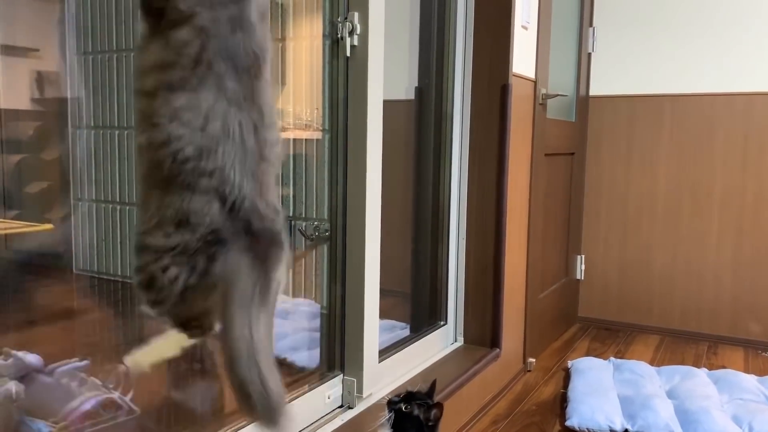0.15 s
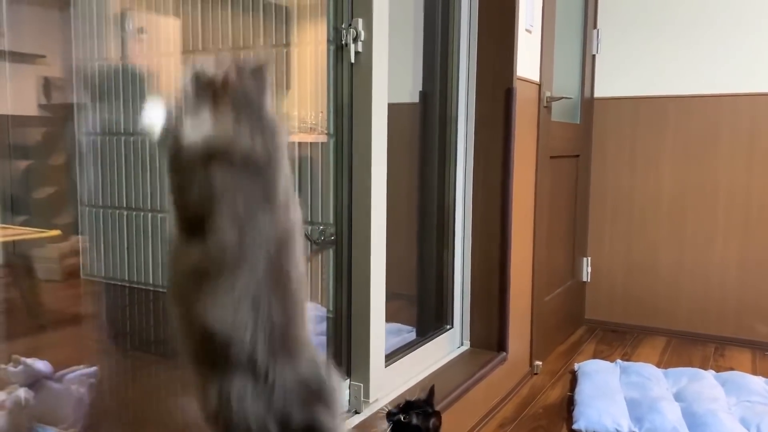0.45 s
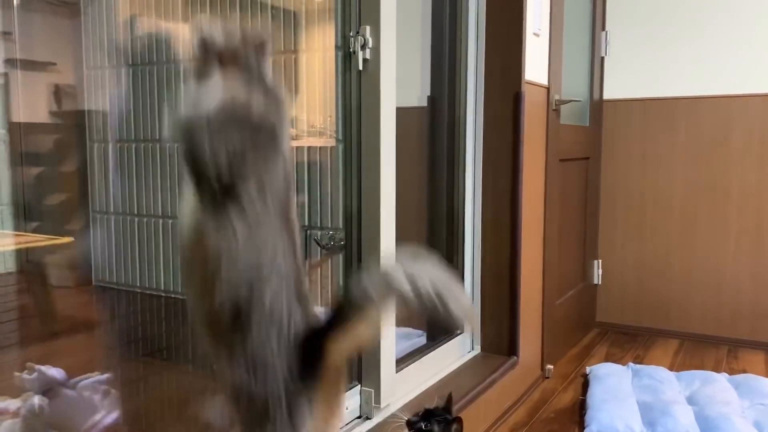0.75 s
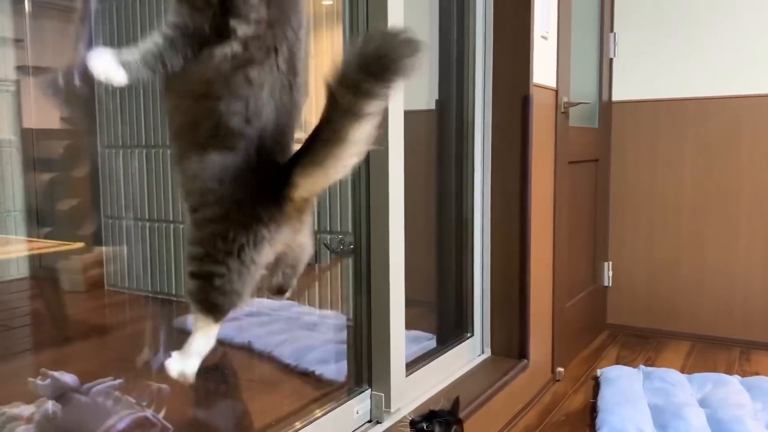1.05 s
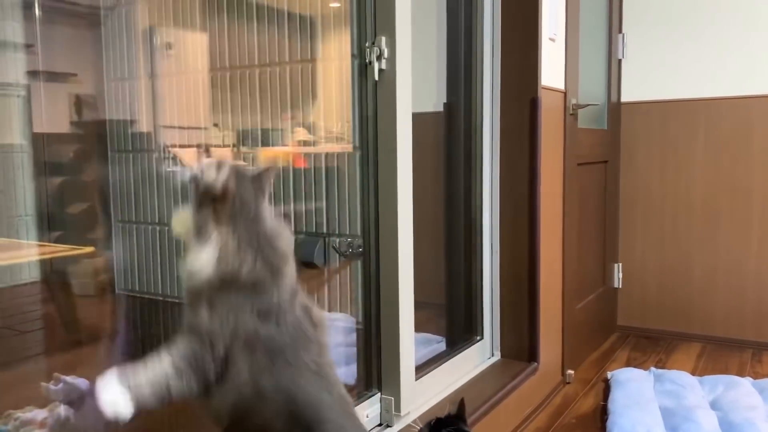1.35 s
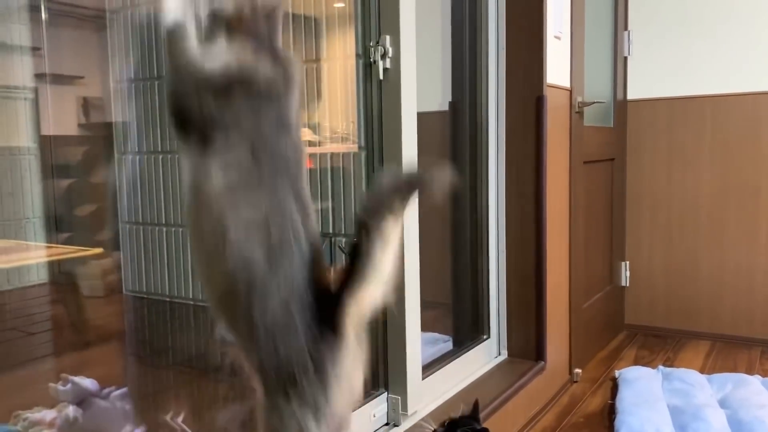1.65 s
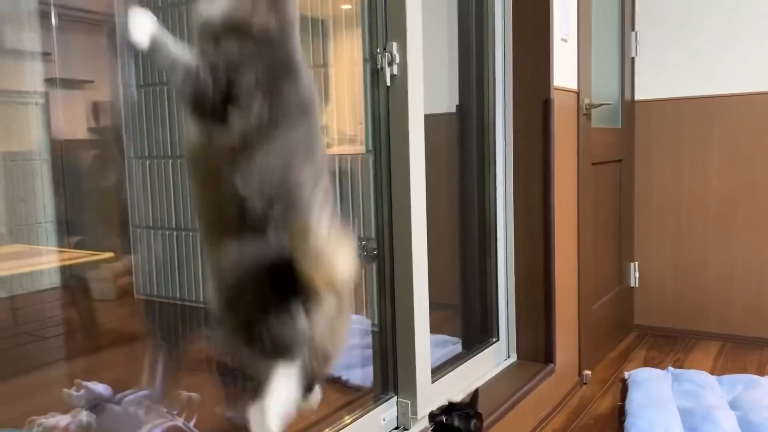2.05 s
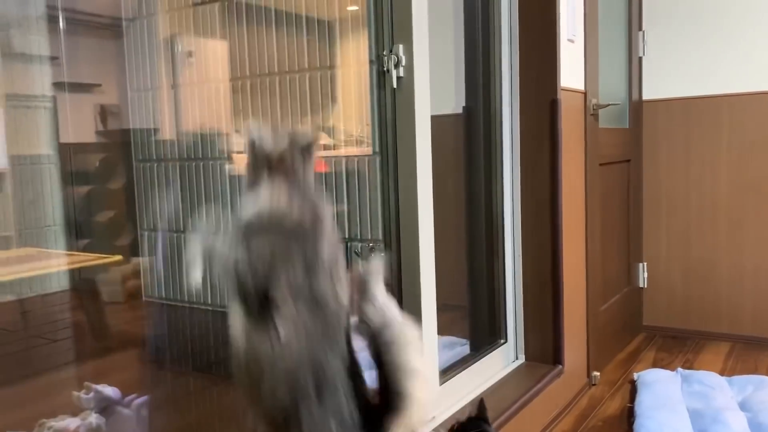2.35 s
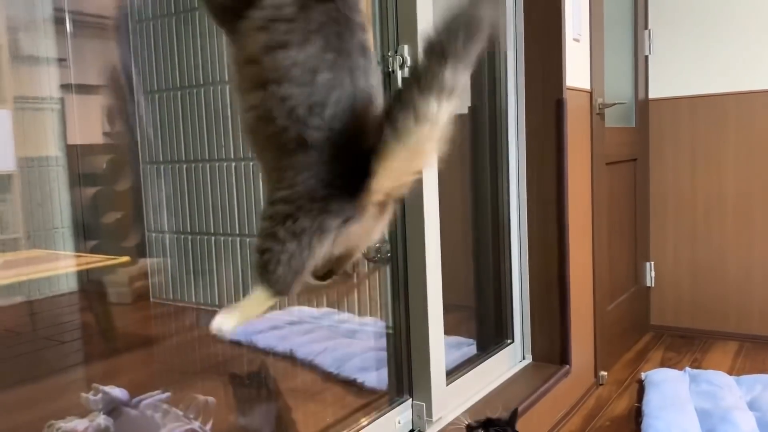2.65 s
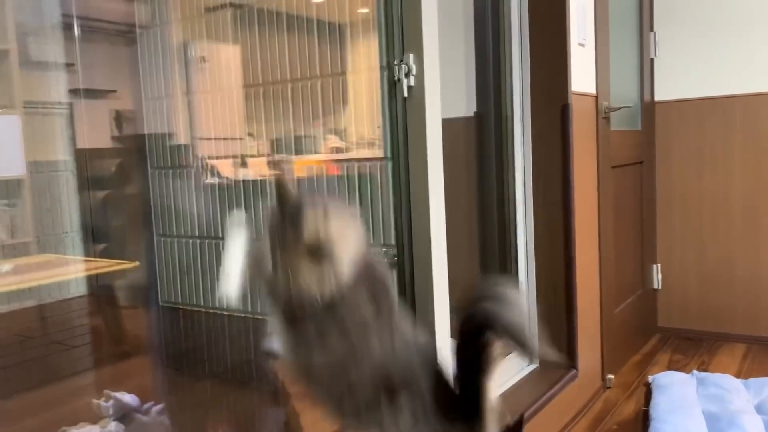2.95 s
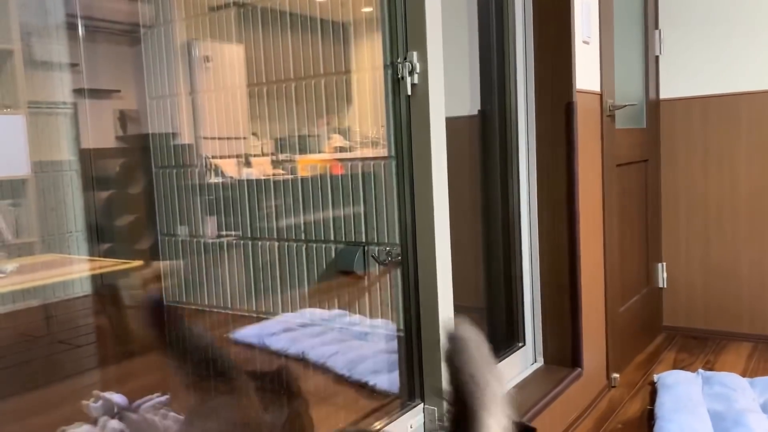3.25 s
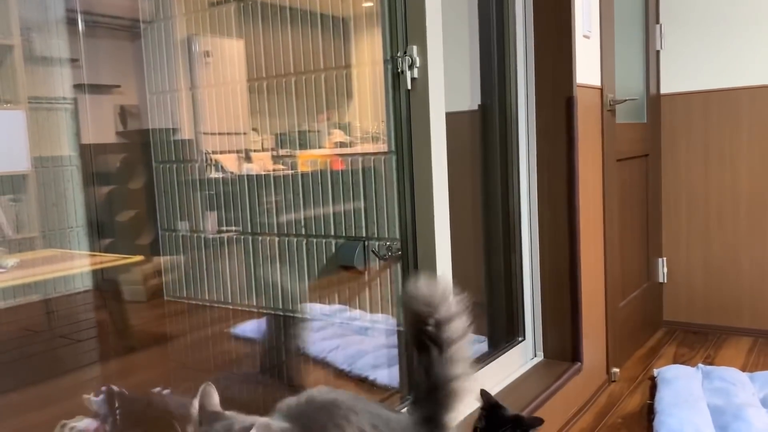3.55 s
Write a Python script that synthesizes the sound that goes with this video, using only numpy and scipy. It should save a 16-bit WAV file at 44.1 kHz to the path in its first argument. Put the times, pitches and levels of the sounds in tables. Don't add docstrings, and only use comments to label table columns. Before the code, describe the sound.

Cat leaping at a sliding glass door: scratches, paw knocks, floor thuds, then a loud clatter.

```python
import sys
import numpy as np
from scipy import signal
from scipy.fft import rfft, irfft
from scipy.io import wavfile
from scipy.ndimage import uniform_filter1d

SR = 44100
rng = np.random.default_rng(int(sys.argv[2]) if len(sys.argv) > 2 else 0)


def materialize(psi):
    bounded = np.clip(np.atleast_2d(psi).T, -1, 1)
    quanta = np.round(bounded * 32767).astype(np.int16)
    wavfile.write(sys.argv[1], SR, quanta)


def nominal_scale(level):
    x = np.asarray(level, float) / 20
    return 10 ** x


N = 163170
T = np.arange(N) / SR

# (frequency [Hz], level [dB])
FRAME_COLOUR = [(420, -5.5), (850, -2), (1500, 5.5), (2400, -1), (4400, -6)]
FRAME_DB = 6
ALIKE_HZ = 840
TOP_HZ = 16000


def unit(x):
    return x / np.sqrt(np.mean(x ** 2) + 1e-20)


def shape(x, gain):
    n = x.shape[-1]
    hz = np.arange(n // 2 + 1) * SR / n + 1e-3
    return irfft(rfft(x) * gain(hz), n)


def ring(modes, db, detune, secs, turn=0):
    hz, base_db, t60 = np.array(modes).T[:, :, None]
    t = T[:int(secs * SR)]
    fade = np.exp(-np.log(1000) * t / np.maximum(t60, 0.001))
    phase = 2 * np.pi * hz * (1 + detune[:, None]) * t + np.reshape(turn, (-1, 1))
    return (nominal_scale(base_db + db[:, None]) * fade * np.sin(phase)).sum(axis=0)


def crowd(colour, cycles, count):
    at, db = np.array(colour).T
    hz = np.geomspace(at[0], at[-1], count)
    level = np.interp(np.log(hz), np.log(at), db)
    return np.array([hz, level, cycles / hz]).T


def strikes(rows, modes, colour, rate, spread_db, first_db, rise_s, push_s, secs, mess, scatter_db=2.0):
    out, n, t = np.zeros(N + SR), len(modes), T[:6000]
    lead = 400
    push = np.hanning(int(push_s * SR) + 3)
    for start_s, level_db, run_s, sharpness in rows:
        luck, grain = rng.standard_normal((3, n)), rng.random((3, len(t)))
        happens, sign = grain[0] < rate / SR, np.sign(grain[2] - 0.5)
        touch = happens * sign * nominal_scale(-spread_db * np.log(grain[1] + 1e-4))
        touch = touch * np.exp(-t / max(run_s, 0.002)) * np.minimum(t / rise_s, 1)
        touch[0] = nominal_scale(first_db)
        body = ring(modes, scatter_db * luck[0], 0.015 * luck[1], secs, np.pi / 2 + mess * luck[2])
        body = shape(np.pad(body, (lead, lead)), lambda hz: nominal_scale(colour(hz, sharpness)))
        sound = signal.fftconvolve(np.convolve(touch, push), body)
        i = int(start_s * SR) - lead
        out[i:i + len(sound)] += sound * nominal_scale(level_db) / np.abs(sound).max()
    return out[:N]


def air():
    # (frequency [Hz], density [dB per Hz])
    hum_spectrum = [(15, -31), (25, 3), (117, -11.5), (185, -5.5), (326, -18.5), (3080, -50), (5430, -54.5),
                    (12000, -54), (16000, -63.5)]
    hz, db = np.array(hum_spectrum).T

    def colour(f):
        return nominal_scale(np.interp(np.log(f), np.log(hz), db)) * (f > 20) * (f < TOP_HZ)

    mid, side = shape(rng.standard_normal((2, N)), colour)
    side = shape(side, lambda f: np.clip(f / ALIKE_HZ, 0.1, 1))
    return unit(mid + side * np.array([[1], [-1]])) * nominal_scale(-52.5)


def wobble():
    # (time [s], level [dB])
    effort = [(0, -80), (.22, -65), (.33, -36.5), (.5, -53), (.75, -44), (.99, -33.5), (1.2, -41.5),
              (1.33, -47.5), (1.62, -44), (1.84, -37.5), (2.15, -46.5), (2.4, -39), (2.66, -42),
              (2.88, -40), (3.12, -44.5), (3.3, -50.5), (3.7, -72)]
    # (frequency [Hz], level [dB], T60 [s])
    pane_modes = [(41, -2, 0.14), (53.7, 4, 0.32), (63.6, -3, 0.2), (90, -9, 0.08)]
    shoves = rng.standard_normal(N) * (rng.random(N) < 70 / SR)
    still = np.zeros(len(pane_modes))
    slow = signal.fftconvolve(shoves, ring(pane_modes, still, still, 0.5))[:N]
    slow = shape(slow, lambda f: 1 / (1 + (f / 110) ** 6))
    slow = slow / np.sqrt(uniform_filter1d(slow ** 2, size=5000) + 0.037 * np.mean(slow ** 2))
    return slow * nominal_scale(np.interp(T, *np.array(effort).T))


def scuffs():
    # (time [s], level [dB], drag [s], sharpness above 1.5 kHz [dB])
    strokes = [(0.125, -67.5, 0.021, -10.5), (0.19, -72, 0.037, 4), (0.79, -53.5, 0.067, -2.5),
               (0.85, -51.5, 0.016, -3.5), (1.12, -56, 0.075, -10), (1.23, -61.5, 0.15, -7),
               (1.69, -61.5, 0.019, -7), (1.728, -50.5, 0.0078, -5), (1.78, -53.5, 0.021, -6),
               (2.49, -53, .03, -8), (2.535, -52.5, .015, -3.5), (2.79, -47.5, 0.017, 0.5),
               (3.3, -68, .08, 2)]

    def sharp(hz, db):
        return db * np.clip(np.log2(hz / 800), 0, 1.5) - 10 * np.log10(1 + (hz / 4200) ** 4)

    return strikes(strokes, crowd(FRAME_COLOUR, cycles=24, count=44), sharp, rate=4000, spread_db=1.8,
                   first_db=-38, rise_s=0.025, push_s=0, secs=0.05, mess=0.45) * nominal_scale(FRAME_DB)


def knocks():
    # (time [s], level [dB], rattle [s], sharpness above 1.5 kHz [dB])
    blows = [(0.132, -51, 0.0039, -21), (0.23, -41.5, 0.0053, -2.5), (0.297, -52, 0.012, 3.5),
             (0.478, -59.5, 0.008, -9.5), (0.511, -41.5, 0.0074, -9), (0.585, -45, 0.0067, -2),
             (0.698, -54.5, 0.048, -10.5), (0.97, -40, 0.007, -11), (1.342, -37, 0.0047, -6),
             (1.386, -38, 0.014, -7), (1.849, -41.5, 0.0089, -6.5), (1.977, -44.5, 0.017, -13),
             (2.229, -38.5, 0.019, -6), (2.276, -33, 0.0089, -8.5), (2.613, -46, 0.023, -2.5),
             (2.831, -38.5, 0.0061, -3), (3.041, -29, 0.034, 6.5), (3.082, -12.5, 0.0017, 4.5),
             (3.091, -39.5, 0.0026, -3), (3.098, -21, 0.001, 0.5), (3.103, -24, 0.0127, -17.5),
             (3.12, -40, 0.004, -7), (3.149, -22, 0.0017, -20)]
    pad_top_hz = 2980

    def sharp(hz, db):
        return db * np.clip(np.log2(hz / 800), 0, 1.5) - 10 * np.log10(1 + (hz / pad_top_hz) ** 5)

    return strikes(blows, crowd(FRAME_COLOUR, cycles=26, count=44), sharp, rate=1500, spread_db=3.0,
                   first_db=-1, rise_s=0.0053, push_s=0, secs=0.08, mess=0.34,
                   scatter_db=0.9) * nominal_scale(FRAME_DB)


def claws():
    # (time [s], level [dB], skid [s], sharpness of the top [dB])
    skids = [(0.2262, -44.5, 0.0079, -3), (0.233, -35, 0.0056, -10.5), (0.24, -43.5, 0.013, -22),
             (0.2545, -34, 0.0035, 3.5), (0.262, -31.5, 0.0058, -4.5), (0.2925, -45.5, 0.006, 5),
             (0.5773, -53.5, 0.027, 3.5), (0.7143, -53.5, 0.021, -4), (0.968, -50, 0.0051, -19),
             (0.978, -28.5, 0.018, 4), (0.986, -22.5, 0.0037, 3), (0.993, -26.5, 0.0081, -8.5),
             (1.2744, -66.5, 0.067, -23), (1.3408, -55, 0.02, 6), (1.4044, -37.5, 0.016, -1),
             (1.726, -70, 0.012, 17), (1.738, -61, 0.0042, 9), (1.79, -60, 0.027, -7),
             (1.8453, -22.5, 0.014, 5), (1.88, -36, 0.018, -1), (1.9776, -30, 0.0074, 0),
             (2.2244, -46, 0.027, -5.5), (2.2757, -44.5, 0.034, 0), (2.469, -60.5, 0.0073, -14),
             (2.615, -24.5, 0.012, 4.5), (2.6894, -39, 0.0099, -14), (2.827, -33, 0.012, -9),
             (2.9427, -44, 0.045, -11.5), (3.045, -32, 0.068, 7), (3.0812, -21.5, 0.0013, 10),
             (3.0905, -17, 0.0033, 2), (3.1, -34.5, 0.029, 16), (3.1393, -36.5, 0.053, -0.5)]
    # (frequency [Hz], level [dB])
    glass_colour = [(2200, 1), (3500, -11), (4550, 19), (5700, 13.5), (8000, 4.5), (12000, -7.5),
                    (15500, -20)]

    def sharp(hz, db):
        return db * np.clip(np.log2(hz / 5500) * 2, 0, 1)

    return strikes(skids, crowd(glass_colour, cycles=24, count=40), sharp, rate=9000, spread_db=2.42,
                   first_db=0, rise_s=0.0013, push_s=0, secs=0.046, mess=0.88,
                   scatter_db=3.8) * nominal_scale(4.5)


def thuds():
    # (time [s], level [dB], push [s], strongest mode [Hz])
    landings = [(0.229, -42, 0.091, 412), (0.297, -27, 0.033, 262), (0.319, -25.5, 0.0024, 267),
                (0.353, -30.5, 0.029, 261), (0.516, -23, 0.014, 244), (0.584, -19.5, 0.0092, 234),
                (0.705, -32.5, 0.05, 266), (0.976, -23.5, 0.024, 310), (1.045, -29.5, 0.032, 275),
                (1.358, -24.5, 0.0033, 149), (1.409, -21, 0.0049, 253), (1.455, -37, 0.0083, 255),
                (1.485, -34.5, 0.012, 242), (1.755, -41.5, 0.16, 142), (1.848, -28, 0.069, 306),
                (1.882, -45, 0.021, 321), (1.928, -35.5, 0.011, 320), (1.983, -30.5, 0.037, 274),
                (2.231, -22, 0.029, 124), (2.283, -18.5, 0.015, 256), (2.635, -32.5, 0.055, 258),
                (2.696, -34, 0.03, 283), (2.83, -27.5, 0.038, 500), (3.044, -20, 0.041, 172),
                (3.091, -13, 0.0085, 295), (3.146, -9.5, 0.015, 286), (3.167, -15.5, 0.021, 272),
                (3.203, -27, 0.02, 241), (3.24, -22.5, 0.0077, 195)]
    # (frequency [Hz], level [dB], T60 [s])
    floor_modes = [(124, -0.5, 0.052), (167.5, -2.5, 0.058), (214.4, -3, 0.049), (255, 0.5, 0.064),
                   (301.6, -3.5, 0.066), (359.6, -0.5, 0.049), (407.7, -3.5, 0.046), (456, -10, 0.024),
                   (512.7, -8, 0.05), (631, -9.5, 0.03), (695, -10.5, 0.044), (786, -12, 0.025),
                   (877, -9, 0.034)]
    focus_db, focus_oct = 5, 0.3

    def focus(hz, strongest_hz):
        return focus_db * np.exp(-(np.log2(hz / strongest_hz) / focus_oct) ** 2)

    return strikes(landings, floor_modes, focus, rate=350, spread_db=2.95, first_db=0, rise_s=0.0038,
                   push_s=0.00083, secs=0.58, mess=1.57)


def bell():
    # (frequency [Hz], level [dB], T60 [s])
    bell_modes = [(3055, -2, .12), (5365, -4, .05), (6290, -12, .04)]
    # (time [s], level [dB], tilt to upper modes [dB])
    taps = [
        (3.33, -53.5, -14),
        (3.347, -60, 18.5),
        (3.415, -68, 7),
        (3.447, -62, 2),
        (3.534, -63, -15.5),
        (3.6, -79, 22),
        (3.63, -70.5, -21),
        (3.68, -72, -12),
    ]
    out, upper = np.zeros(N + SR), np.arange(len(bell_modes)) > 0
    for s, db, tilt_db in taps:
        tap = ring(bell_modes, tilt_db * upper, 0.0069 * rng.standard_normal(len(bell_modes)), 0.18)
        tap = tap * np.minimum(T[:len(tap)] / 0.0047, 1)
        i = int(s * SR)
        out[i:i + len(tap)] += nominal_scale(db) * tap
    return out[:N]


def room():
    # (frequency [Hz], T60 [s])
    room_decay = [(125, 0.36), (500, 0.41), (2000, 0.45), (5000, 0.46), (12000, 0.59)]
    at, secs = np.array(room_decay).T
    t, out = T[:SR // 2], 0
    mid, side = rng.standard_normal((2, len(t)))
    for hz in 62.5 * 2 ** np.arange(9):
        t60 = np.interp(np.log(hz), np.log(at), secs)
        pair = mid + np.clip(hz / ALIKE_HZ, 0.2, 1) * side * np.array([[1], [-1]])
        band = shape(pair, lambda f: np.clip(1 - np.abs(np.log2(f / hz)), 0, 1))
        band = band * np.exp(-np.log(1000) * t / t60)
        out = out + band * np.sqrt(hz / np.sum(band ** 2, axis=1, keepdims=True))
    out = out * np.clip((t - 0.002) / 0.0051, 0, 1)
    return out / np.sqrt(np.mean(np.sum(out ** 2, axis=1)))


def scene():
    parts = claws() + bell(), knocks(), thuds(), scuffs()
    wet_db = -2, 3, -3.5, 0
    pan_db, soft_walls_hz = 2.47, 9900

    def dull(f):
        return (f < TOP_HZ) / (1 + (f / soft_walls_hz) ** 2)

    far = 0
    for part, db in zip(parts, wet_db):
        sent = shape(part, dull)[None] * nominal_scale(db)
        far = far + signal.fftconvolve(sent, room())[:, :N]
    direct = sum(parts) * nominal_scale(np.array([[pan_db], [-pan_db]]) / 2)
    return direct + far + wobble() + air()


def top_cut(x):
    return signal.sosfilt(signal.butter(12, 16650, fs=SR, output="sos"), x)


def record(dry):
    one_path_hz, lag_from_hz, port_lag_s = 7270, 1810, 0.000259
    case_from_hz, case_step_hz = 1400, 260
    turns = np.cumsum(rng.standard_normal(100))

    def share(f):
        return 1 / (1 + (one_path_hz / f) ** 8)

    def lag(f):
        return np.exp(2j * np.pi * f * port_lag_s * np.clip(f / lag_from_hz - 0.5, 0, 1))

    def case(f):
        phase = np.interp(f / case_step_hz, np.arange(100), turns - turns[0])
        return np.exp(1j * phase * np.clip(f / case_from_hz - 0.5, 0, 1))

    right = shape(dry[1], lambda f: (1 - share(f)) * case(f)) + shape(dry[0], share)
    right = shape(right, lag)
    return top_cut(np.array([dry[0], right]))


dry = scene()
out = record(dry)
materialize(out)
```